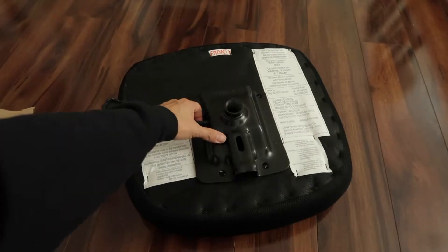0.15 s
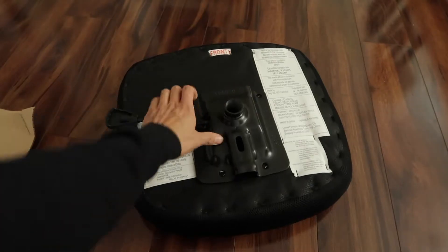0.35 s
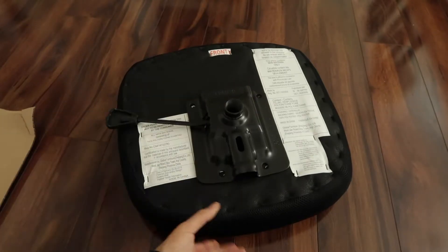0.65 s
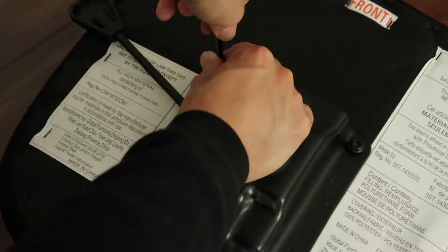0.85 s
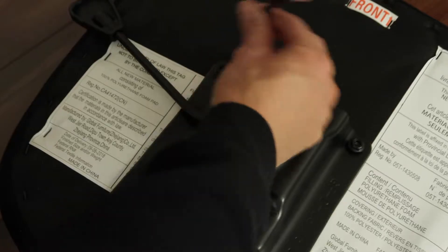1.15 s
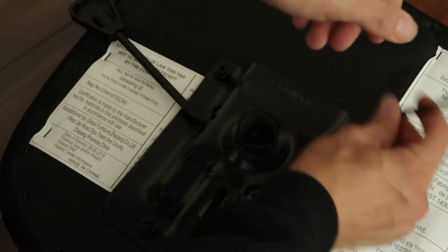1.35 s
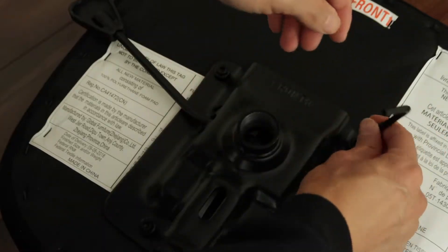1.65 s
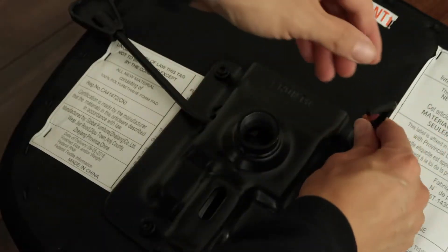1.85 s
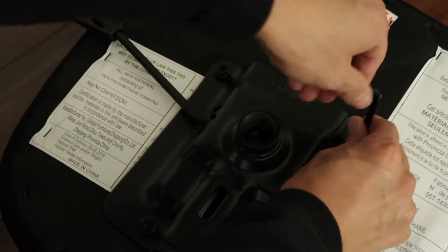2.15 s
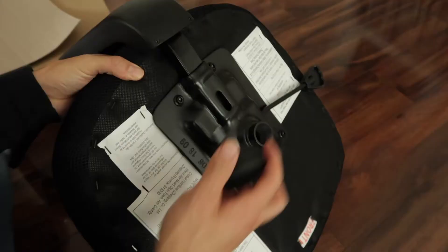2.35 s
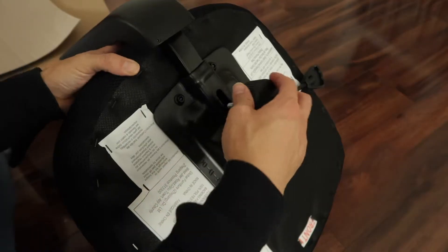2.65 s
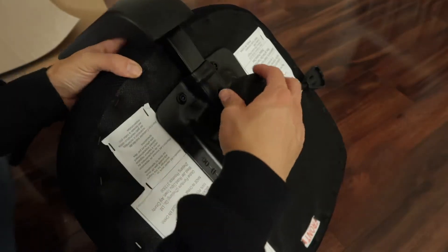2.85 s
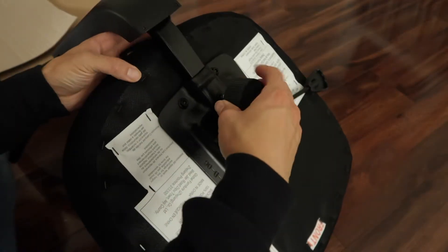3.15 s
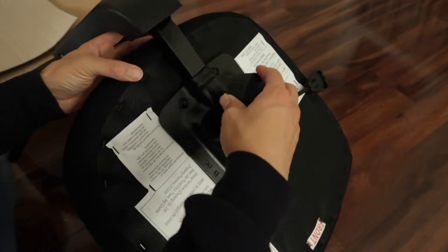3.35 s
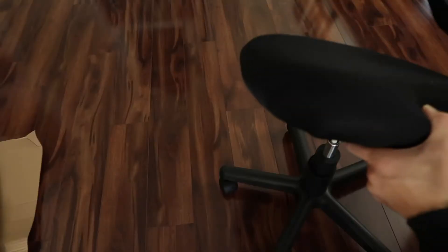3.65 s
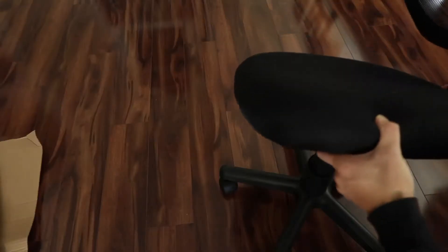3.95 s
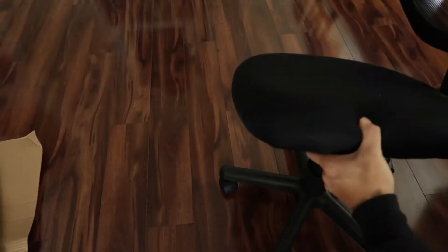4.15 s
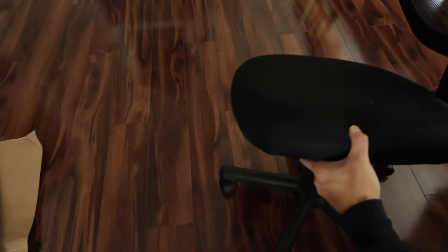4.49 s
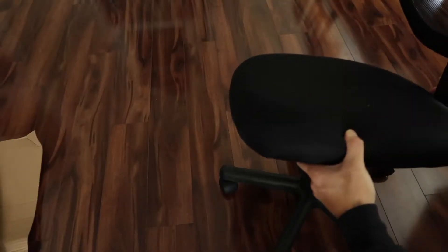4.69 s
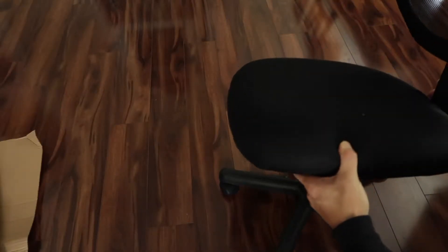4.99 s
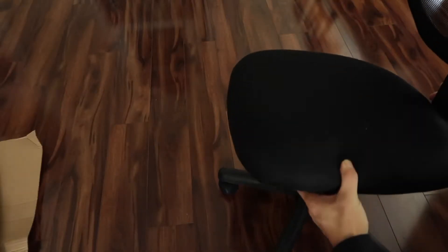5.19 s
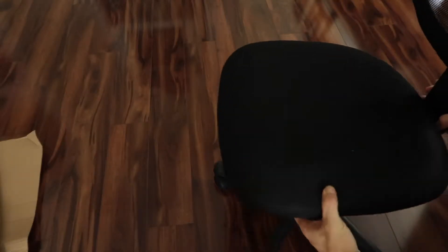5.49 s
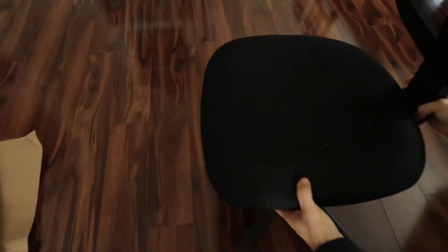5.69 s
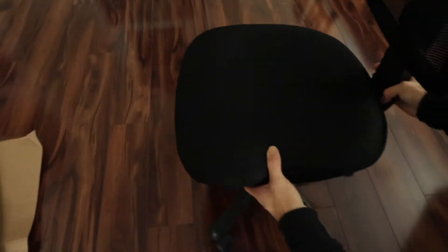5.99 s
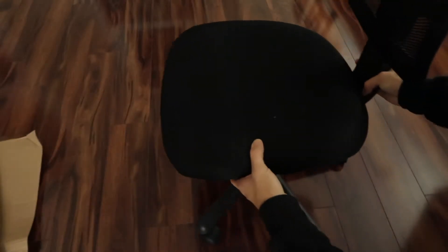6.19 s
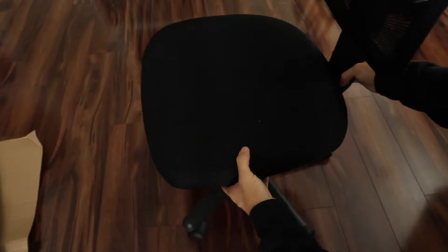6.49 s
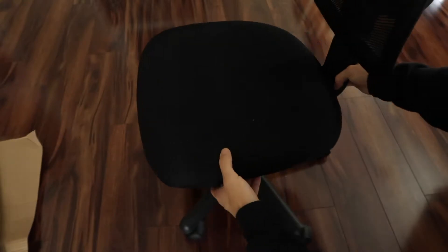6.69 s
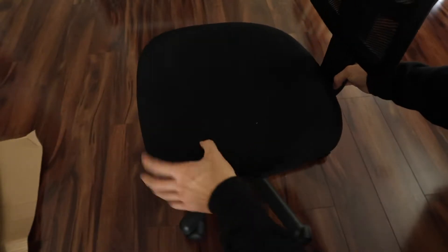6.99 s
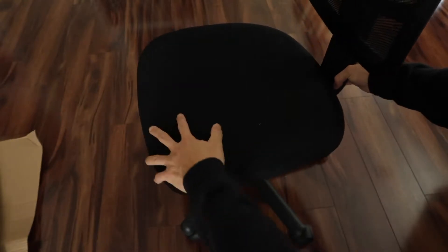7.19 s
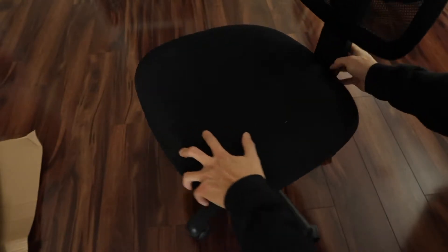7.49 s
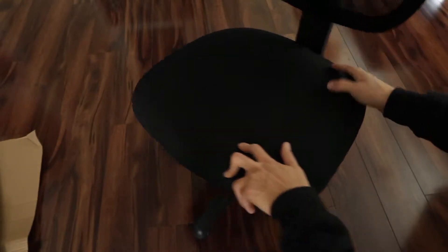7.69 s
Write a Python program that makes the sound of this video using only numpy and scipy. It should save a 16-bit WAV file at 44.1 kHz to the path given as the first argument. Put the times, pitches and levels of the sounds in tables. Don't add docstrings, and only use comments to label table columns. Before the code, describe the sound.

Close stereo pickup of chair parts being assembled indoors, over low hum and faint hiss. First a ringing steel plate and a bright clank with bounce, then dull tool knocks and a very loud double snap chopped short by a scene change. Hard bolt rattling follows, then hollow post thuds, low stuttering padded bumps, a heavy scraping drop, and quiet hand rubs.

```python
import sys
import numpy as np
from scipy import signal
from scipy.fft import rfft, irfft
from scipy.io import wavfile

SR = 44100
rng = np.random.default_rng(int(sys.argv[2]) if len(sys.argv) > 2 else 0)


def decibels_to_gain(level_db):
    exponent = np.asarray(level_db, float) / 20
    return 10 ** exponent


def master(y):
    cut = np.clip(np.atleast_2d(y).T, -1, 1)
    pcm = np.round(cut * 32767)
    wavfile.write(sys.argv[1], SR, pcm.astype(np.int16))


N = 345744


def curve(table):
    s, db = np.transpose(table)
    return np.interp(np.arange(N) / SR, s, db)


def strokes(table):
    peak_s, db, rise_s, fall_s = np.transpose(table)[:4, :, None]
    late_s = np.arange(0, N, 32) / SR - peak_s
    gain = decibels_to_gain(db - 20 * np.maximum(-late_s / rise_s, late_s / fall_s))
    return np.repeat(gain, 32, axis=1)[:, :N]


def decay(t, t60):
    return np.exp(-np.log(1000) * t / t60)


def colour(x, table):
    hz, db = np.transpose(table)
    f = np.maximum(np.fft.rfftfreq(x.shape[-1], 1 / SR), 1)
    gain = decibels_to_gain(np.interp(np.log(f), np.log(hz), db))
    return irfft(rfft(x) * gain, x.shape[-1])


def unit(x):
    return x / np.sqrt(np.mean(x ** 2))


def filtered(x, order, hz, kind="low"):
    return signal.sosfilt(signal.butter(order, hz, kind, fs=SR, output="sos"), x)


def add(track, s, y):
    i = int(s * SR)
    y = y[max(-i, 0):N - i]
    start = max(i, 0)
    track[start:start + len(y)] += y


def grains(rate, spread_db):
    happens = rng.random(N) < rate / SR
    return happens * rng.standard_normal(N) * decibels_to_gain(spread_db * rng.exponential(size=N))


def resonate(x, peaks):
    out = 0
    for hz, width_hz, db in peaks:
        b, a = signal.iirpeak(hz, hz / width_hz, SR)
        out = out + decibels_to_gain(db) * signal.lfilter(b, a, signal.lfilter(b, a, x))
    return unit(out)


def modes(table, pitch, contact_s, stagger, tilt_db=0, flutter_db=0):
    hz, db, t60 = np.transpose(table)[:, :, None]
    t60 = np.clip(t60, .004, .8)
    t = np.arange(int(.6 * t60.max() * SR)) / SR
    level_luck, phase_luck, pitch_luck = rng.standard_normal((3, *hz.shape))
    mix = decibels_to_gain(db + 1.5 * level_luck + tilt_db * np.log2(hz / hz[0]))
    waver = decibels_to_gain(flutter_db * rng.standard_normal((len(hz), 60)))
    mix = mix * [np.interp(t, np.arange(60) * .008, w) for w in waver]
    phase = 2 * np.pi * hz * pitch * (1 + 0.00243 * pitch_luck) * t + stagger * phase_luck
    y = -np.sum(mix * decay(t, t60) * np.sin(phase), axis=0)
    y = y * np.sin(np.pi / 2 * np.minimum(t / contact_s, 1)) ** 2
    return y / np.abs(y).max()


def crowd(ring, spread, under_db):
    away = spread * (.5 + rng.random((len(ring), 2))) * [-1, 1]
    out = list(ring)
    for (hz, db, t60), pair in zip(ring, away):
        out += [(hz * (1 + a), db + under_db, 0.5 * t60) for a in pair]
    return out


def pings(table):
    out = np.zeros(N)
    for s, db, hz, t60 in table:
        t = np.arange(int(t60 * SR)) / SR
        add(out, s, decibels_to_gain(db) * np.minimum(t * hz, 1) * decay(t, t60) * np.sin(2 * np.pi * hz * t))
    return out


def tick(table, decay_s):
    t = np.arange(2048) / SR
    burst = rfft(rng.standard_normal(2048) * np.exp(-t / decay_s))
    flat = irfft(burst / np.abs(burst))
    y = colour(flat, table) * np.exp(-t / (3 * decay_s)) * np.minimum(t / .0008, 1)
    return y / np.abs(y).max()


def ticks(table, decay_s):
    out = np.zeros(N)
    for s, db, hz in table:
        band = [(hz * .55, -30), (hz * .85, 0), (hz * 1.15, 0), (hz * 1.5, -25)]
        add(out, s, decibels_to_gain(db) * tick(band, decay_s))
    return out


def blows(hits, thud, contact_s, tick_colour, decay_s, low_hz):
    out = np.zeros(N)
    for s, thud_db, tick_db, pitch in hits:
        add(out, s, decibels_to_gain(thud_db) * modes(thud, pitch, contact_s, 0.75))
        add(out, s + contact_s / 2, decibels_to_gain(tick_db + 3.5) * tick(tick_colour, decay_s))
    return filtered(out, 2, low_hz, "high")


def clanks(hits, thud, contact_s, tick_colour, decay_s, low_hz, ring, flutter_db, tilt_db=0):
    dull = [(s, thud_db, tick_db, pitch) for s, thud_db, tick_db, _, pitch in hits]
    out = blows(dull, thud, contact_s, tick_colour, decay_s, low_hz)
    for s, _, _, ring_db, _ in hits:
        add(out, s, decibels_to_gain(ring_db) * modes(ring, 1, .001, 3.0, tilt_db, flutter_db))
    return out


def padded(hits, tick_db):
    return [(s, db, db + tick_db, pitch) for s, db, pitch in hits]


# time in seconds, level in dB.
AIR_LEVEL = [(0, -65), (.2, -71.5), (.38, -68), (.6, -72), (.81, -61.5), (2.45, -62.5), (2.7, -59.5),
             (3.3, -70), (3.5, -62.5),
             (4.0, -62.5), (7.84, -62)]
# frequency in Hz, density in dB per Hz.
AIR_COLOUR = [(12, -46), (20, 0.5), (150, -4.5), (290, -6.5), (598, -17), (1300, -20.5), (11500, -42),
              (15600, -71)]
# frequency in Hz, rms level in dB.
WHINE = [(13006, -91)]


def air():
    mid, side = colour(rng.standard_normal((2, N)), AIR_COLOUR)
    side = colour(side, [(60, -29.5), (200, -11.0), (500, -3.0), (1200, 0.5)])
    scale = np.std(filtered(mid, 4, [1500, 6000], "band"))
    t = np.arange(N) / SR
    whine = sum(np.sqrt(2) * decibels_to_gain(db) * np.sin(2 * np.pi * hz * t) for hz, db in WHINE)
    waver_db = 4 * np.interp(np.arange(N), np.arange(0, N, 1500), rng.standard_normal(N // 1500 + 1))
    gain = decibels_to_gain(curve(AIR_LEVEL) - 1.74)
    return np.array([mid + side, mid - side]) / scale * gain + whine * decibels_to_gain(waver_db)


# band centre in Hz, t60 in seconds.
ROOM_T60 = [(100, 0.43), (300, 0.37), (1000, 0.49), (4000, 0.52), (9000, 0.21), (16000, 0.2)]


def room():
    t = np.arange(SR // 2) / SR
    tail = 0
    for hz, t60 in ROOM_T60:
        shape = [(hz / 2.0, -40), (hz / 3.7, -3), (hz * 1.85, -3), (hz * 3, -40)]
        tail = tail + colour(rng.standard_normal((2, len(t))), shape) * decay(t, t60)
    mid, side = tail * np.clip((t - .004) / 0.005, 0, 1) / np.sqrt(np.sum(tail[0] ** 2))
    return mid, colour(side, [(100, -40.5), (1000, -13.0), (4000, -3.5), (12000, 10.0)])


def place(x, echoes, wet_db, lag, pan, dull_hz):
    far = x * np.minimum(np.arange(N) / 300, 1) ** 2
    far = filtered(far, 4, dull_hz)
    mid, side = (decibels_to_gain(wet_db) * signal.fftconvolve(far, e)[:N] for e in echoes)
    return np.array([x + mid, lag * np.gradient(x) + pan * x + side])


# peak in seconds, level in dB, rise in seconds, fall in seconds.
CLOTH = [
    (.11, -60.5, 0.05, 0.09),
    (5.41, -75, .03, 0.03),
    (5.63, -89, 0.17, .12),
    (5.75, -53.5, .045, 0.12),
    (5.86, -66.5, 0.045, 0.51),
    (6.68, -65.5, 0.72, 0.077),
    (7.6, -59.5, 0.85, 0.41),
]


def cloth():
    shape = [(500, -13), (2000, -4.0), (6000, -12.5), (12000, -27.0), (16000, -21.0)]
    return strokes(CLOTH).sum(axis=0) * unit(colour(grains(5600, 1.5), shape))


# peak in seconds, level in dB, rise in seconds, fall in seconds.
BUZZES = [
    (1.758, -40, .003, 0.088),
    (1.826, -38.5, .003, 0.047),
    (1.85, -37.5, 0.0033, 0.11),
    (2.171, -33.5, 0.0046, .1),
    (4.993, -37, 0.0034, 0.064),
    (6.82, -52, 0.14, 0.03),
    (3.004, -38.5, .005, 0.21),
    (2.815, -31, .003, 0.093),
    (7.74, -58.5, .015, 0.59),
]
# frequency in Hz, width in Hz, level in dB.
HOUSING = [(1357, 700, 4), (1879, 800, -1.5), (2700, 660, 0.5), (3500, 800, -7)]


def buzz():
    return strokes(BUZZES).sum(axis=0) * resonate(grains(4000, 1.5), HOUSING)


# time in seconds, peak in dB, centre in Hz.
SMALL_TICKS = [
    (1.5796, -39.5, 5450),
    (2.5735, -43, 5300),
    (2.7082, -38, 5460),
    (2.7337, -37.5, 5470),
    (2.8345, -26, 6900),
    (3.25, -47, 5750),
    (3.5674, -47.5, 4400),
    (5.7392, -43, 4540),
               (1.515, -33, 14140),
    (2.574, -43.5, 10900),
    (2.733, -40.5, 9830),
    (2.88, -27.5, 11500),
    (3.0235, -22.5, 11900),
    (5.734, -50, 10100),
]


def small_contacts():
    return ticks(SMALL_TICKS, 0.002)


# time in seconds, thud in dB, tick in dB, ring in dB, pitch factor.
BOLT_HITS = [(2.539, -45, -49.5, -39.5, 0.8), (2.556, -34, -45.5, -49, 0.44),
             (2.574, -47, -32, -29.5, 0.83), (2.582, -34, -36.5, -43, 0.8), (2.709, -52, -37, -35, 0.87),
             (2.732, -35, -29.5, -35.5, 0.31), (2.809, -11.5, -22, -12, 0.91),
             (2.811, 2.5, -11.5, -32, 1.115), (2.835, -24.5, -40.5, -33, 0.54),
             (2.88, -15, -14.5, -16, 1.14), (2.918, -10, -42, -24, 1.01), (2.947, -17.5, -23.5, -36, 0.7),
             (3.013, -18.5, -46.5, -34, 1.6), (3.022, -8, -8, -38, 0.89), (3.091, -15, -30.5, -29.5, 1.17),
             (3.252, -25.5, -47.5, -38.5, 1)]
# frequency in Hz, level in dB, t60 in seconds.
BOLT_THUD = [(810, -8, 0.0144), (865, -2, 0.019), (1200, 4, 0.0023), (1800, -11, 0.018), (2210, -5, 0.0062)]
BOLT_RING = [(940, -14, 0.24), (2150, -23.5, .04), (2920, 0.5, 0.1192), (3159, 4.5, 0.11),
             (3505, -19, 0.094)]
# frequency in Hz, density in dB per Hz.
BOLT_TICK = [(880, -29), (1500, -42), (2110, 1.5), (3030, -2), (3620, -9), (4700, -12), (7000, -25),
             (15600, -36)]
# time in seconds, peak in dB, frequency in Hz, t60 in seconds.
BOLT_PINGS = [(2.811, -15, 2125, 0.016), (2.811, -15.5, 3190, .02), (2.835, -19, 2960, 0.0171),
              (2.88, -12, 2890, 0.029), (2.918, -17, 857, 0.032), (2.948, -16, 3150, .015),
              (3.012, -20, 1480, 0.023), (3.012, -28.5, 2348, 0.01705), (3.0225, -4.5, 358, 0.032),
              (3.0225, -4, 849, .02), (3.0225, -0.5, 641, 0.014), (3.03, -23.5, 135.5, 0.18),
              (3.022, -6, 2044, 0.013), (3.055, -37, 293, 0.048), (3.091, -20, 880, 0.048),
              (2.59, -35, 328, 0.15), (2.811, -20.5, 262, .04), (2.87, -18, 950, .03)]
# time in seconds, level in dB.
CHATTER = [(2.805, -36), (2.87, -43), (2.93, -28), (3.0, -34), (3.05, -23.5), (3.12, -40.5), (3.2, -46),
           (3.3, -53.5)]
# peak in seconds, level in dB, rise in seconds, fall in seconds.
SLIDES = [
    (2.59, -48, 0.045, 0.082),
    (2.74, -60, .04, .15),
    (3.2, -59, .2, 0.34),
]
# frequency in Hz, width in Hz, level in dB.
BRACKET = [(388, 275, 7.5), (903, 360, 10.5), (1740, 510, 2.5), (3090, 640, -4.5), (4800, 4200, -23)]
SLOT = [(3180, 1050, 0)]


def chatter():
    start, end = CHATTER[0][0], CHATTER[-1][0]
    running = curve([(start - .01, 0), (start, 1), (end, 1), (end + 0.051, 0)])
    knocks = decibels_to_gain(curve(CHATTER)) * running * resonate(grains(1500, 2.0), BRACKET)
    return knocks + strokes(SLIDES).sum(axis=0) * resonate(grains(2000, 2.0), SLOT)


def bolt():
    knocks = clanks(BOLT_HITS, BOLT_THUD, contact_s=0.0015, tick_colour=BOLT_TICK, decay_s=0.0017,
                    low_hz=320, ring=crowd(BOLT_RING, .03, 1), flutter_db=8.3)
    return knocks + chatter() + pings(BOLT_PINGS)


# time in seconds, thud in dB, tick in dB, pitch factor.
KEY_HITS = [
    (1.7545, -12.5, -25.5, 0.98),
    (1.821, -6.5, -22, 1),
    (1.845, -13, -16.5, 1.09),
    (2.088, -30.5, -48, 1.04),
    (2.123, -35, -45, 0.65),
    (2.165, -5.5, -8, 1.155),
]
SNAP_HITS = [
    (2.4075, -24, -50, 1.3),
    (2.4148, 7, -10, 1.005),
    (2.4202, 5.5, -2, 1.01),
    (2.4238, -5.5, -19, 1.04),
]
# frequency in Hz, level in dB, t60 in seconds.
KEY_THUD = [(410, -4, 0.037), (478.5, 4, 0.024), (588, 8, 0.0095), (804, -0.5, 0.028), (1063, -22, 0.035),
            (1280, -14, 0.036)]
SNAP_THUD = [(445, -14.5, 0.093), (560, -6.5, 0.023), (708, -1.5, 0.02), (1310, -5, 0.014),
             (1653, -9.5, 0.015), (2060, -16, 0.017)]
# frequency in Hz, density in dB per Hz.
KEY_TICK = [(700, 0.5), (1300, 0), (2300, -2.5), (3500, -3.5), (5000, -12.5), (7500, -27.5), (10000, -34),
            (15600, -60)]
# time in seconds, peak in dB, centre in Hz.
SNAP_PINS = [
    (2.4148, -20, 10240),
    (2.4205, -15.5, 8000),
    (2.421, -19, 11000),
    (2.4235, -14, 7960),
]
# time in seconds, peak in dB, frequency in Hz, t60 in seconds.
KEY_PINGS = [(1.8215, -17.5, 2130, .02), (1.8215, -21.5, 3500, 0.011), (1.826, -22, 2600, 0.033),
             (1.846, -23, 2350, 0.014), (1.852, -21, 2370, 0.022), (1.861, -22, 2200, 0.022),
             (1.865, -22, 3090, 0.022), (1.755, -23, 2450, 0.017), (1.846, -18, 1200, 0.013),
             (2.1625, -17.5, 630, 0.017), (2.166, -7.5, 758, 0.024), (2.166, -9, 410.6, .03),
             (2.1665, -18, 4100, 0.0092), (2.18, -30, 3600, .08), (2.175, -24.5, 493, 0.11),
             (2.178, -26.5, 865, .08), (2.172, -36, 3200, 0.023), (2.177, -26, 1960, 0.028),
             (2.183, -26, 3240, 0.029)]


def key():
    knocks = blows(KEY_HITS, KEY_THUD, contact_s=0.0026, tick_colour=KEY_TICK, decay_s=0.004, low_hz=350)
    snap = blows(SNAP_HITS, SNAP_THUD, contact_s=0.00054, tick_colour=KEY_TICK, decay_s=0.0019, low_hz=290)
    return knocks + snap + ticks(SNAP_PINS, 0.00113) + pings(KEY_PINGS)


# time in seconds, thud in dB, tick in dB, ring in dB, pitch factor.
OPENING_HIT = [
    (-.006, -9, -80, -46, 1.0),
    (.015, -14, -80, -53, 0.95),
]
LEVER_HIT = [
    (.3945, -39.5, -49.5, -48, 1.3),
]
PLATE_HITS = [
    (.4602, -22, -21, -20.5, 1),
    (.4618, -7.5, -37, -56, 0.94),
]
PLATE_BOUNCES = [
    (.4860, -9, -33, -30.5, 1.105),
    (.508, -27, -48, -58, 0.89),
    (.831, -37.5, -66, -74, 1.29),
]
TAP_HITS = [
    (1.0595, -33, -60, -70, 1.98),
    (1.078, -37.5, -60, -70, 2.44),
]
# frequency in Hz, level in dB, t60 in seconds.
OPENING_THUD = [(207, -12.5, 0.092), (320, 7, 0.24), (395, -2.5, 0.33), (470, -9.5, 0.49), (495, -23, 0.7),
                (582, -12.5, 0.26), (815, -21.5, 0.35), (928, -25.5, 0.62), (1014, -7, 0.069)]
PLATE_THUD = [(217, 0.5, 0.047), (310, 5.5, 0.036), (370.5, 3.5, 0.049), (443, -23, 0.0059),
              (628, 3.5, 0.0084), (838, -18, 0.05), (1070, -27, 0.07)]
OPENING_RING = [(1690, -6, 0.5), (1870, -8, 0.35), (2430, -1.5, 0.5), (3478, -9, .6)]
LEVER_RING = [(3060, 0, 0.2), (3120, -6, .12)]
PLATE_RING = [(1685, -3, .45), (1886, -4, .4), (2229, -6, .4), (2425, 1, .62), (3055, -5, .22),
              (3440, -1, .16), (3690, -2, .2), (4170, -8, .25), (4600, -8, .25), (5510, 3, .24),
              (5830, -3, .22), (7200, -4, .18), (7550, -3, .18), (10320, -3, .16)]
TAP_RING = [(2420, 0, 0.16)]
# frequency in Hz, density in dB per Hz.
PLATE_TICK = [(530, 2), (900, -27), (1290, -4), (3260, 1.5), (7340, -3), (8470, -25), (10500, -9.5),
              (15600, -21)]
# time in seconds, peak in dB, frequency in Hz, t60 in seconds.
PLATE_PINGS = [(0, -54.5, 2437, .7), (0, -60, 1680, .6), (0, -31.5, 475, 0.37), (0, -42, 818, 0.34),
               (0, -47.5, 1070, 0.36), (.392, -54.5, 1860, 0.33), (.392, -64, 2440, 0.25),
               (.392, -45, 974, 0.068), (.461, -45, 2420, 0.61), (.461, -37, 6460, 0.085),
               (.461, -46, 6100, 0.12), (.461, -30.5, 3050, 0.095), (.486, -42.5, 2060, 0.24),
               (.486, -50, 1800, 0.32), (.53, -42, 2240, .3), (1.06, -42, 2700, .015),
               (1.06, -35, 1010, .02), (1.079, -42, 2520, 0.019), (1.079, -40.5, 3320, .015),
               (1.103, -51, 2380, 0.078),
               (.461, -34, 3700, 0.14), (.461, -35, 3440, 0.14), (.461, -39, 4320, 0.16),
               (.475, -37, 4590, 0.09), (.475, -42, 4800, 0.072), (.461, -33, 5505, 0.13),
               (.52, -50, 2420, 0.58), (0.46, -24, 203, 0.086), (.461, -43, 7260, 0.15),
               (.461, -41, 7570, 0.13), (.461, -41, 7950, 0.14), (.461, -52, 8390, 0.22),
               (.461, -51, 8750, 0.18), (.487, -22.5, 379.8, .2), (.461, -36, 5900, .07),
               (.49, -68, 9640, .35), (.49, -59.5, 10000, 0.32)]


def plate():
    ring = crowd(PLATE_RING, .05, -5)
    out = clanks(OPENING_HIT, crowd(OPENING_THUD, .06, -5), contact_s=.003, tick_colour=PLATE_TICK,
                 decay_s=.005, low_hz=120, ring=OPENING_RING, flutter_db=5.0)
    for hits, metal, tilt_db in ((LEVER_HIT, LEVER_RING, 0), (TAP_HITS, TAP_RING, 0),
                                 (PLATE_HITS, ring, 0), (PLATE_BOUNCES, ring, -27)):
        out = out + clanks(hits, PLATE_THUD, contact_s=.0022, tick_colour=PLATE_TICK, decay_s=.006,
                           low_hz=120, ring=metal, flutter_db=5.5, tilt_db=tilt_db)
    return out + pings(PLATE_PINGS)


# frequency in Hz, density in dB per Hz.
POST_TICK = [(600, -42), (1000, 21), (1800, 6), (3200, -3), (4500, -31), (8000, -38), (16000, -74)]
# time in seconds, thud in dB, tick in dB, pitch factor.
POST_HITS = [
    (4.617, -11, -51, 0.98),
    (4.63, -17.5, -44.5, 0.92),
    (4.964, -29, -41, 1.24),
    (4.975, -24, -39, 0.81),
    (4.987, -6, -18.5, 0.954),
    (5.013, -33, -30, 1.2),
    (5.033, -28, -31, 0.86),
    (5.068, -15, -34, 1.06),
    (5.108, -21, -47, 1.08),
    (7.724, -36, -41, 0.79),
]
# time in seconds, thud in dB, pitch factor.
FRAME_HITS = [
    (.466, -18.5, 1.146),
    (3.05, -24.5, 0.968),
    (4.995, -17.5, 0.735),
]
# frequency in Hz, level in dB, t60 in seconds.
POST_THUD = [(153, -3.5, 0.055), (235, 2, 0.033), (406, -3, 0.029), (560, 0.5, 0.017), (735, -3.5, 0.018),
             (927, -13, 0.02)]
FRAME_THUD = [(76.4, -24, 0.42), (130, 0.5, 0.034), (203.6, 3, 0.028), (301, 15, 0.02), (370, -14, 0.02)]
# time in seconds, peak in dB, frequency in Hz, t60 in seconds.
POST_PINGS = [(4.9875, -4, 940, 0.02), (4.9875, -21.5, 1670, .02), (4.9875, -26.5, 2980, 0.019),
              (4.99, -31, 2320, 0.022), (4.987, -43, 5500, .006), (5.001, -15.5, 845, 0.048),
              (5.001, -30, 1890, 0.036), (5.005, -53, 4150, 0.051), (5.038, -28, 996, 0.045),
              (5.09, -30, 1044, .08), (5.124, -28, 977, 0.052), (4.962, -32.5, 822, 0.11),
              (5.505, -18.5, 644, 0.013), (5.628, -19.5, 900, 0.018), (6.626, -30, 680, .02),
              (6.655, -17, 615, 0.039), (4.619, -30, 990, 0.01), (4.619, -14, 560, 0.024),
              (4.619, -17.5, 380, .05), (4.63, -34, 980, 0.027), (4.628, -27, 600, 0.03),
              (4.646, -27, 503, 0.038), (4.66, -26, 470, .04), (4.673, -29, 590, 0.029),
              (4.692, -30, 447, 0.085), (4.725, -41, 560, 0.09), (5.586, -40, 3180, .02),
              (5.74, -42, 3670, 0.034), (5.84, -48, 3600, .02), (7.036, -41.5, 2190, 0.026)]


def post():
    knocks = blows(POST_HITS, POST_THUD, contact_s=0.0035, tick_colour=POST_TICK, decay_s=0.0084, low_hz=78)
    frame = blows(padded(FRAME_HITS, tick_db=-58), FRAME_THUD, contact_s=0.013, tick_colour=POST_TICK,
                  decay_s=.004, low_hz=22)
    return knocks + frame + pings(POST_PINGS)


# peak in seconds, scrape in dB, rise in seconds, fall in seconds,
# weight on the padding in dB.
PUSHES = [
    (5.04, -50, 0.1, 0.14, 6),
    (5.39, -44, 0.67, 0.081, 2),
    (5.62, -35.5, 0.29, 0.24, 6.5),
    (5.9, -49.5, 0.9, 2.3, 10),
    (6.449, -52.5, 0.012, 0.06, 3),
    (6.681, -18.5, 0.057, 0.066, 4),
    (6.83, -40, 0.056, 0.097, -21),
    (6.909, -41.5, 0.018, 0.21, 13),
    (7.069, -33.5, 0.068, 0.063, 6),
    (7.738, -50, 0.019, 0.81, 5.5),
]
# peak in seconds, level in dB, rise in seconds, fall in seconds.
JINGLES = [
    (5.42, -67, 0.17, .2),
    (5.51, -55, 0.022, 0.1),
    (5.745, -49, 0.013, 0.064),
]
RUB = [
    (6.79, -38, 0.18, 0.13),
]
# frequency in Hz, width in Hz, level in dB.
SEAT_RUMBLE = [(40.3, 29, 6.5), (83, 27.4, 2.5), (147.3, 24.5, 6.5), (246.3, 46, 5.5), (353.5, 114, -0.5)]
SEAT_SCRAPE = [(649, 293, 12.5), (892, 430, 7.5), (1410, 1450, -15)]
SEAT_RATTLE = [(1970, 980, 7), (3200, 1220, 8.5), (3740, 470, -16.5)]
CASING = [(1680, 910, 0)]


def drag():
    push = strokes(PUSHES)
    scrape = push.sum(axis=0)
    rumble = decibels_to_gain(np.array(PUSHES)[:, 4]) @ push
    rattle = decibels_to_gain(-34.5) * scrape ** 0.59 + strokes(JINGLES).sum(axis=0)
    slips = grains(500, 0.72)
    padding = rumble * resonate(slips, SEAT_RUMBLE)
    shell = scrape * resonate(slips + grains(1600, 2.1), SEAT_SCRAPE)
    metal = rattle * resonate(grains(2900, 1.1), SEAT_RATTLE)
    casing = strokes(RUB)[0] * resonate(slips + grains(1100, 2.5), CASING)
    return .6 * (padding + shell + metal + casing)


# time in seconds, thud in dB, pitch factor.
SEAT_HITS = [(5.436, -24, 1.1), (5.467, -18.5, 0.993), (5.502, -10.5, 1.04), (5.536, -13, 1.09),
             (5.583, -11.5, 1), (5.625, -9.5, 0.944), (5.669, -16, 1.1), (5.684, -13.5, 0.93),
             (5.73, -29, 0.73), (6.612, -20, 1.06), (6.656, -13.5, 0.86), (6.676, -7.5, 0.935),
             (6.687, -12.5, 1.0), (6.693, -9, 1.08), (6.707, -13.5, 1), (6.73, -14.5, 0.82),
             (6.774, -14.5, 0.724), (7.033, -21.5, 1.03)]
# frequency in Hz, level in dB, t60 in seconds.
SEAT_THUD = [(75.5, -12, 0.012), (119.5, 2.5, 0.04), (242, -1.5, 0.035), (338, -11, 0.019),
             (579, -14.5, 0.026), (987, -20, 0.028)]


def seat():
    thuds = blows(padded(SEAT_HITS, tick_db=-32), SEAT_THUD, contact_s=0.00452, tick_colour=POST_TICK,
                  decay_s=0.019, low_hz=73)
    return thuds + drag()


def scene():
    echoes = room()
    before = place(plate(), echoes, wet_db=-7, lag=.4, pan=.006, dull_hz=14000)
    before = before + place(key(), echoes, wet_db=-5.5, lag=-0.9, pan=-.045, dull_hz=8500)
    cut_s = 2.4258
    before = before * np.clip((cut_s * SR - np.arange(N)) / 16, 0, 1)
    after = place(bolt() + small_contacts(), echoes, wet_db=-9.5, lag=-0.7, pan=-.03, dull_hz=11000)
    after = after + place(post(), echoes, wet_db=-2.15, lag=-0.32, pan=-0.022, dull_hz=3600)
    after = after + place(seat() + cloth() + buzz(), echoes, wet_db=-5.5, lag=0.399, pan=-.004, dull_hz=5000)
    mid, side = before + after
    return np.array([mid + side, mid - side]) + air()


def roll_off(x):
    return signal.sosfilt(signal.butter(12, 15700, fs=SR, output="sos"), x)


def record(dry):
    x = filtered(dry, 2, 28, "high")
    x = x / (1 + np.abs(x) ** 6) ** (1 / 6)
    x = filtered(x, 10, 15300)
    return roll_off(x)


dry = scene()
out = record(dry)
master(out)
```